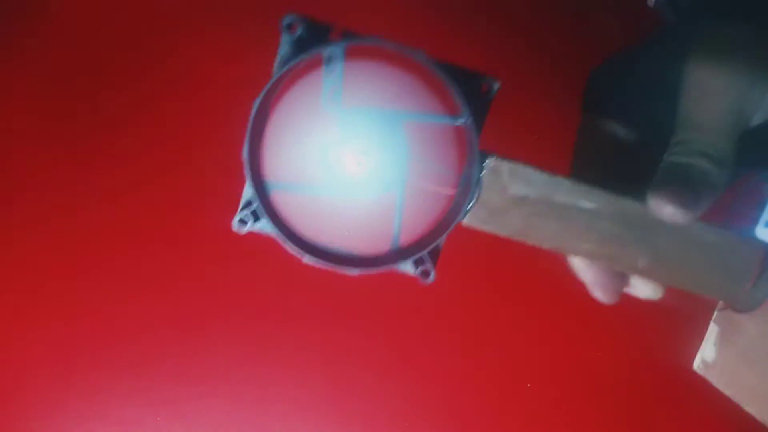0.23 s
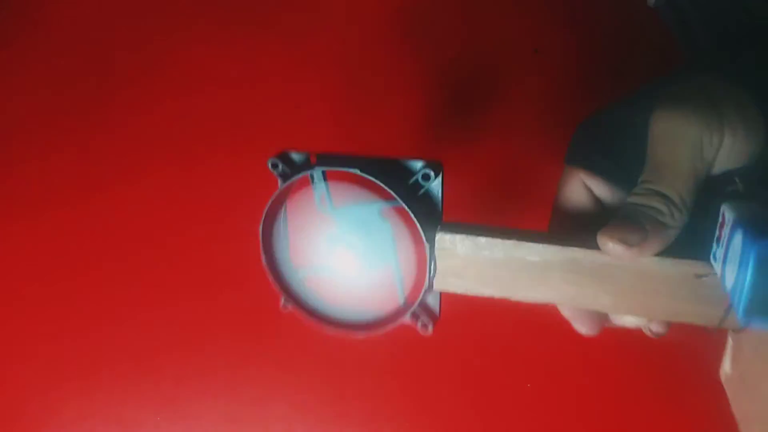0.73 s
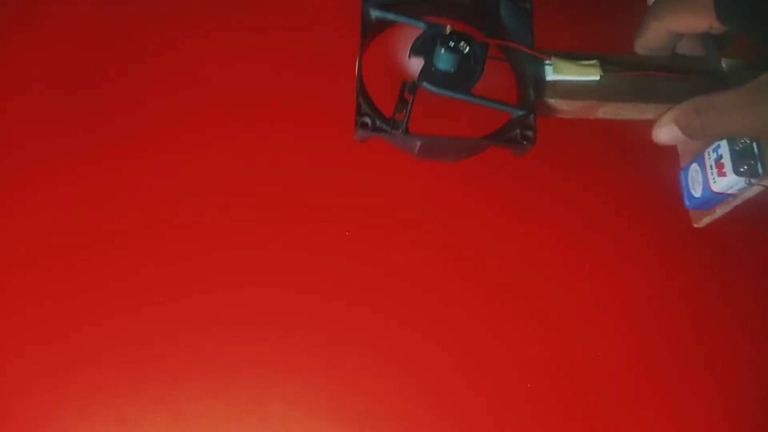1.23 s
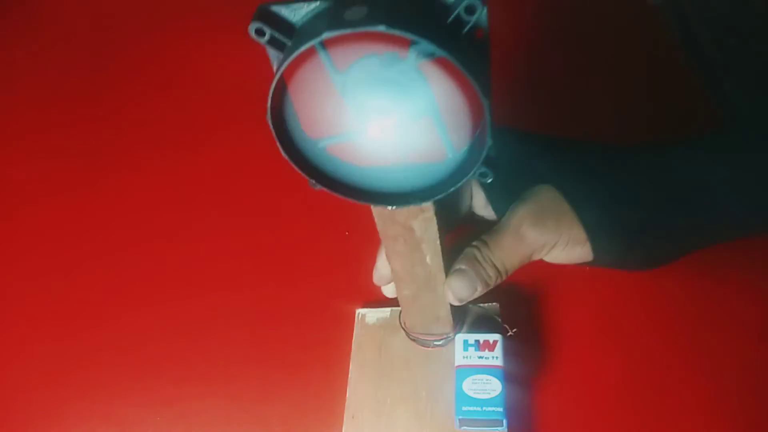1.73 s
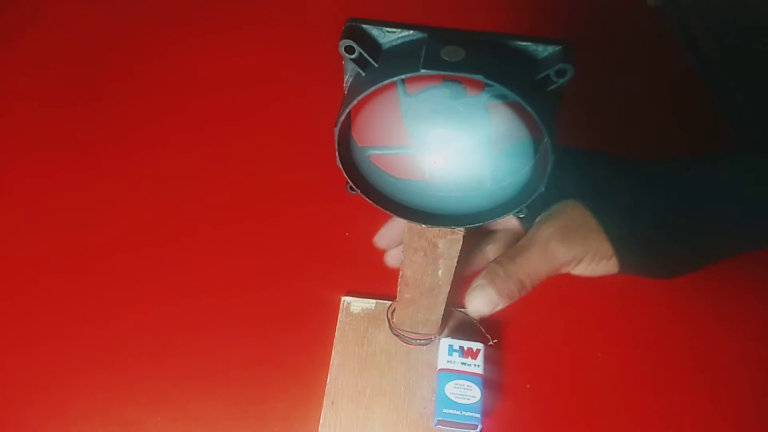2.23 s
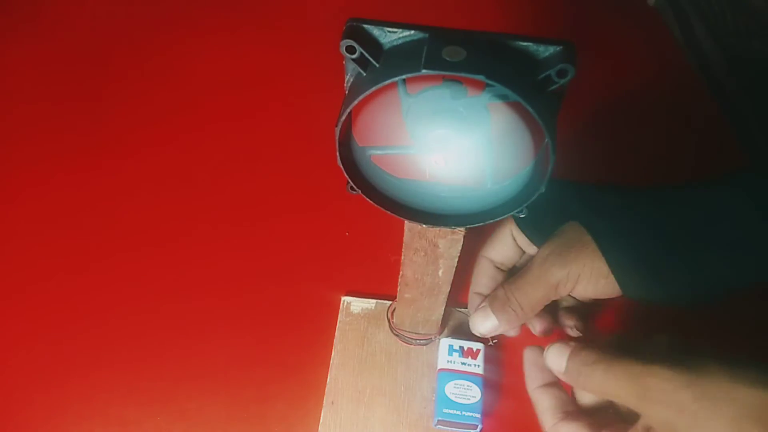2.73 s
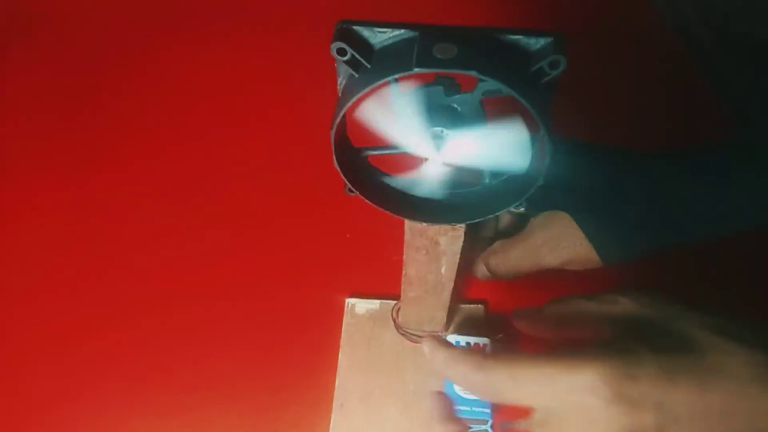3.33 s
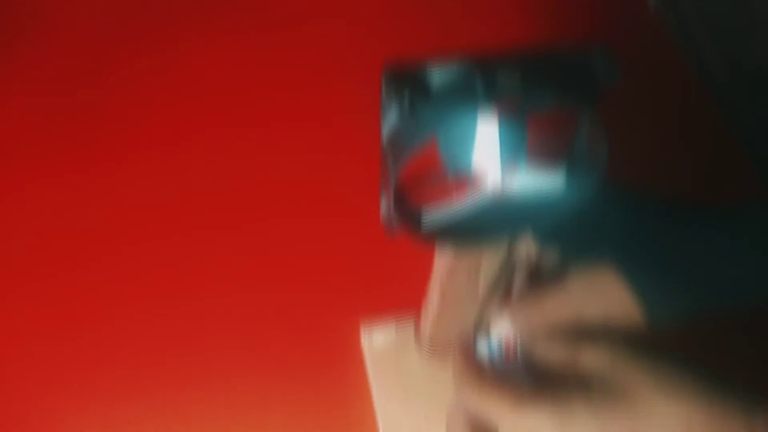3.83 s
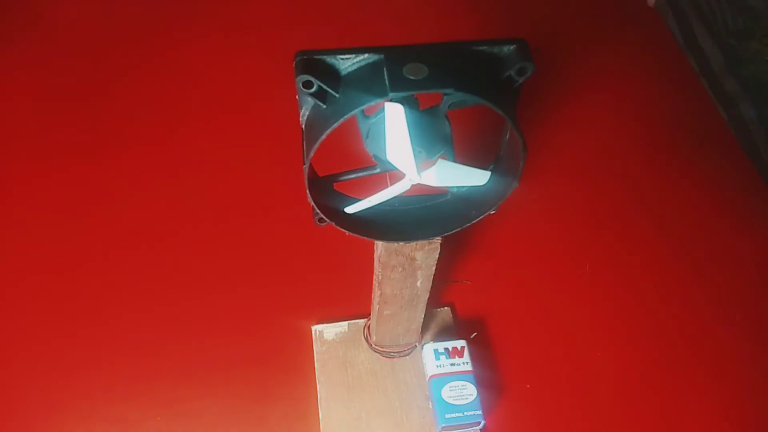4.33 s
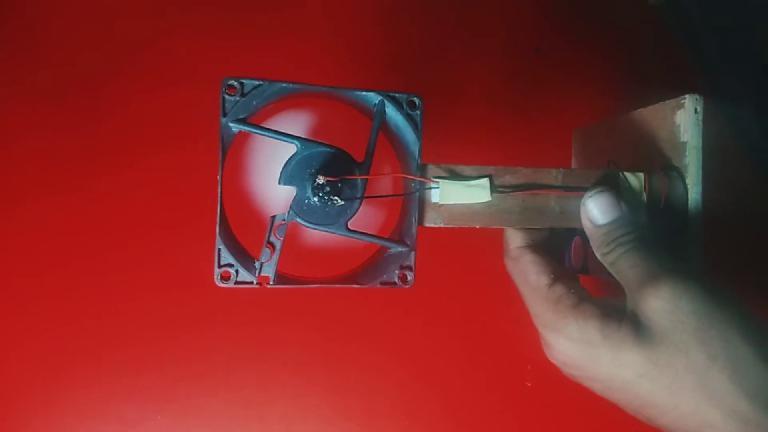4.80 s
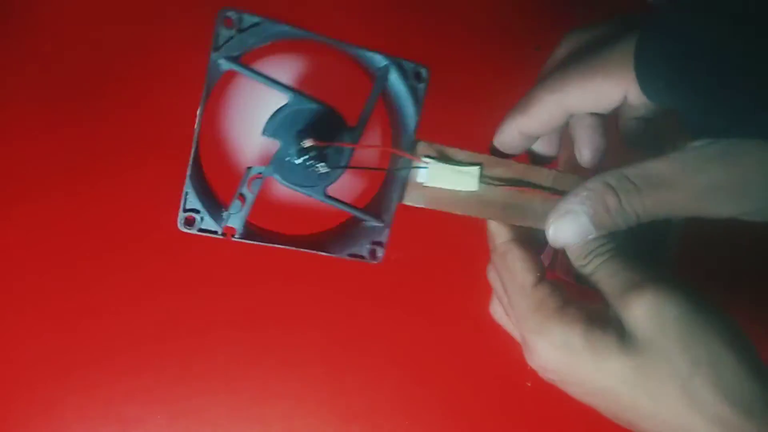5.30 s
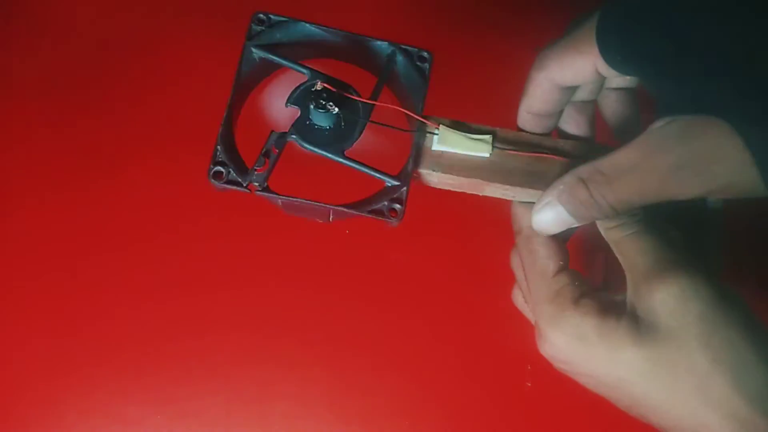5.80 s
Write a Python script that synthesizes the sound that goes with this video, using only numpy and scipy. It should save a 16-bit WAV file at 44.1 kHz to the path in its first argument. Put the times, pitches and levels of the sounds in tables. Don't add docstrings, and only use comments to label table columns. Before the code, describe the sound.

Close whirring of a little battery fan cuts out and coasts down, soft table knocks and ticks follow, then the hum rises again with windy buffeting.

```python
import sys
import numpy as np
from scipy import signal
from scipy.fft import rfft, irfft, next_fast_len
from scipy.io import wavfile
from scipy.ndimage import uniform_filter1d, map_coordinates

SR = 44100
rng = np.random.default_rng(int(sys.argv[2]) if len(sys.argv) > 2 else 0)


def boost(x):
    u = np.asarray(x, float) / 20
    return 10 ** u


def store_wav(level_fs):
    pcm = np.round(np.clip(np.atleast_2d(level_fs), -1, 1) * 32767)
    wavfile.write(sys.argv[1], SR, pcm.T.astype(np.int16))


N = 267025

OFF_S, ON_S = 0.585, 3.27


def unit(x):
    return x / np.sqrt(np.mean(np.abs(x) ** 2) + 1e-20)


def along(points, hz):
    f, v = np.transpose(points)
    return np.interp(np.log(hz + 1), np.log(f + 1), v)


def curves(rows):
    s, *columns = np.transpose(rows)
    return [np.interp(np.arange(N) / SR, s, column) for column in columns]


def wobble(rate):
    knots = rng.standard_normal(int(N * rate / SR) + 4)
    return map_coordinates(knots, [np.arange(N) * rate / SR])


def held(rows, rest, ease_s):
    t = np.arange(N) / SR
    steps = rest + sum((value - rest) * ((t >= start) & (t < end)) for start, end, value in rows)
    return uniform_filter1d(steps, size=max(round(ease_s * SR), 1))


def filtered(x, response):
    m = next_fast_len(N + 8192)
    return irfft(rfft(x, m) * response(np.fft.rfftfreq(m, 1 / SR)), m)[..., :N]


def panned(db):
    return boost(np.array([db / 2, -db / 2]))


def noise(spectrum, alike):
    def mid_side(hz):
        turn = np.arccos(np.clip(along(alike, hz), -1, 1)) / 2
        return boost(along(spectrum, hz)) * np.array([np.cos(turn), np.sin(turn)])

    mid, side = filtered(rng.standard_normal((2, N)), mid_side)
    return unit(np.array([mid + side, mid - side]))


def patchy(x, depth_db):
    z = signal.stft(x, nperseg=512)[2]
    field = uniform_filter1d(rng.standard_normal(z.shape[1:]), size=7, axis=0)
    field = uniform_filter1d(field, size=8, axis=1)
    return unit(signal.istft(z * boost(depth_db * unit(field)), nperseg=512)[1][:, :N])


def add(out, s, burst):
    at = round(s * SR) - burst.shape[-1] // 2
    place = out[..., at:at + burst.shape[-1]]
    place += burst[..., :place.shape[-1]]


def boom(db, hz, length, ragged_db, reach_hz, skew=0):
    t = np.arange(-3000, 3000) / SR
    band = signal.butter(2, [hz, hz + reach_hz], "band", fs=SR, output="sos")
    rag = signal.sosfilt(band, rng.standard_normal(len(t)))
    swell = boost(db - 6.0 * (2 * t / (length * (1 + skew * np.sign(t)))) ** 2)
    return swell * (np.cos(2 * np.pi * hz * t + rng.uniform(0, 7.5)) + boost(ragged_db) * unit(rag))


# (f/Hz, level/dB per Hz)
ROOM = [(18, -39), (30, -27), (81, -8), (225, -10), (293, -18.5), (482, -17), (928, -25), (1270, -29.5),
        (6610, -41.5), (14100, -36), (15700, -25.5)]
# (f/Hz, likeness 0-1)
ROOM_ALIKE = [(60, 0.79), (180, 0.9), (550, 0.35), (1650, 0.057), (4970, 0.12), (15000, 1)]


def room():
    return boost(-64 + 0.14 * wobble(6.1)) * noise(ROOM, ROOM_ALIKE)


def bump(s, db, hz, length, pan_db, out):
    wood = boom(db + 3.5, hz, length * 0.93, ragged_db=-15.5, reach_hz=91)
    add(out, s, panned(pan_db)[:, None] * wood)


# (t/s, level/dB, length/s)
THUMPS = [(1.122, -61, .022), (1.293, -56.5, 0.043), (1.552, -56, .024), (1.612, -54, 0.017),
          (1.829, -53.5, .026), (1.87, -53.5, 0.028), (2.107, -50, .036), (2.182, -53, 0.053),
          (2.313, -58.5, 0.029), (2.368, -60, 0.026), (2.463, -56.5, .038), (2.623, -49, 0.022),
          (2.652, -51, .04), (2.698, -50, 0.029), (3.042, -56, 0.02), (3.194, -61, .029),
          (3.238, -51, .018), (3.277, -56, 0.022), (3.31, -52, 0.031), (3.353, -47.5, 0.029),
          (3.385, -43, 0.022)]


def thumps():
    out = np.zeros((2, N))
    for s, db, length in THUMPS:
        hz = 79 * (1 + 0.12 * rng.standard_normal())
        bump(s, db, hz, length, -2, out)
    return out


# (t/s, level/dB, f/Hz, length/s)
JUDDERS = [(1.212, -58, 231, 0.035), (1.229, -57.5, 359, .04), (1.274, -56, 340, 0.02),
           (1.31, -58, 217, .069), (1.34, -62, 328, .022), (1.449, -52, 273, 0.026),
           (1.537, -56.5, 254, 0.035), (1.668, -48, 219, .063), (1.74, -49.5, 215, 0.025),
           (2.895, -56, 209.3, 0.017), (3.227, -57.5, 210, 0.039), (3.266, -56.5, 206, 0.022)]


def judders():
    out = np.zeros((2, N))
    for s, db, hz, length in JUDDERS:
        bump(s, db, hz, length, 3.5, out)
    return out


# (t/s, level/dB, treble level/dB, snap at the front level/dB)
TICKS = [(1.2994, -60, -9, -20), (1.4352, -55, -20, -8), (1.462, -58, -10, -20), (1.5294, -58, -13, -20),
         (1.8123, -61, -12, 8), (1.828, -62, 9, -4), (1.9585, -54, -16, -0.5), (1.974, -54, -20, -20),
         (2.755, -58, -14, -14), (3.0394, -64, -9, -10), (3.2482, -56, -4, -10), (3.2999, -52, -16, -14),
         (3.34, -46, -18, -20)]
TICK_T60_S, TICK_RISE_S, SNAP_T60_S = 0.065, 0.007, 0.005
# (from t/s, to t/s, level/dB)
RUBS = [
    (.8, 1.15, -69.5),
    (1.15, 1.95, -67),
    (1.95, 2.6, -75.5),
    (2.6, 2.85, -72),
    (2.85, 3.2, -80),
    (3.2, 3.38, -64.5),
]


def ticks_and_scuffs():
    t = np.maximum(np.arange(-3000, 3000), 0) / SR
    mid_colour = [(500, -20.0), (1000, 3.5), (2200, -1), (2800, 0.5), (3500, -3), (4700, -4), (5500, -17.5)]
    mid = noise(mid_colour, [(1000, 0.18)])
    top = noise(HISS, [(1000, 0.98)])
    strikes = np.zeros((2, N))
    for s, db, top_db, snap_db in TICKS:
        fade = boost(db - 2.0 - 60 * t / TICK_T60_S) * (1 - np.exp(-t / TICK_RISE_S))
        snap = boost(db + snap_db - 60 * t / SNAP_T60_S) * (t > 0)
        add(strikes, s, (fade + snap) * np.array([[1], [boost(top_db)]]))
    scuff = boost(held(RUBS, -100, 0.15) - 2.5 + 2 * wobble(22))
    return (strikes[0] + scuff) * mid + strikes[1] * top


# (t/s, level/dB, f/Hz)
PUFFS_LEFT = [(.67, -56, 114), (5.304, -37, 91), (5.363, -33.5, 97), (5.457, -36, 117), (5.487, -29.5, 124),
              (5.596, -29, 156), (5.609, -27.5, 94), (5.653, -38, 75), (5.693, -29.5, 133),
              (5.733, -33, 117), (5.854, -38.5, 86)]
# (t/s, level/dB, f/Hz)
PUFFS_RIGHT = [(0.148, -33, 155), (.67, -50, 113), (.723, -49, 103), (.752, -46, 91), (.797, -48.5, 103),
               (0.828, -54.5, 91), (0.885, -52.5, 96), (0.919, -47, 123), (.985, -47.5, 95),
               (3.736, -43, 102), (4.06, -40.5, 85), (4.368, -38.5, 86), (4.418, -29, 136.2),
               (4.796, -38, 97), (4.823, -28.5, 153), (5.137, -33, 144), (5.393, -30, 119),
               (5.427, -34, 113), (5.515, -33, 107), (5.58, -20, 172), (5.611, -29, 106), (5.658, -28, 150),
               (5.685, -28.5, 159), (5.72, -26, 90), (5.764, -24.5, 125), (5.785, -23, 121),
               (5.901, -31.5, 123.2), (5.925, -31, 106)]
EDDY_CYCLES = 2.2


def puffs():
    out = np.zeros((2, N))
    for port, rows in zip(out, (PUFFS_LEFT, PUFFS_RIGHT)):
        for s, db, hz in rows:
            length = EDDY_CYCLES / hz
            blow = boom(db + 6, hz, length * 0.83, ragged_db=-14.5, reach_hz=151, skew=0.63)
            heave = boom(db - 9.0, hz * 0.65, length * 2.2, ragged_db=-5, reach_hz=40)
            add(port, s - 0.004, blow)
            add(port, s, heave)
    return out


def driven(on, off):
    return held([(OFF_S, ON_S, off)], on, 0.035)


FRESH_HZ, TIRED_HZ, SAG_HZ_PER_S = 175.26, 175.3, 1.7
COAST_S, SPIN_UP_S, CREEP_HZ = 0.2, 0.2, 25.02
STARTED_S = 0.4


def speed():
    t = np.arange(N) / SR
    first = FRESH_HZ * np.tanh((t + STARTED_S) / SPIN_UP_S) / (1 + np.maximum(t - OFF_S, 0) / COAST_S)
    since = np.maximum(t - ON_S, 0)
    second = (TIRED_HZ - SAG_HZ_PER_S * since) * np.tanh(since / SPIN_UP_S)
    return np.maximum(np.maximum(first, second), CREEP_HZ)


def slowing():
    return np.log2(TIRED_HZ / uniform_filter1d(speed(), size=900))


PIECE_S, FIRST_CUT_S = 0.065, 0.035


def spliced(curve):
    t = (np.arange(N) / SR - FIRST_CUT_S) / PIECE_S
    stepped = np.floor(t) + 0.5 + (t % 1 - 0.5) * 0.3
    at = (uniform_filter1d(stepped, size=400) * PIECE_S + FIRST_CUT_S) * SR
    return np.interp(at, np.arange(N), curve)


# (t/s, left later by/ms, left-right level/dB, tone level/dB, whistle level/dB)
AIM = [
    (0, -0.1, -7.5, -3, -10),
    (.15, -0.027, -12, 3, -8.5),
    (.6, 0.07, -9, 1.5, -8.5),
    (3.3, -0.027, -6.5, 1, -6.5),
    (3.8, 0.0044, -10.5, 1.5, -6),
    (4.3, -0.038, -8.5, -2, -4.5),
    (4.75, 0.035, -10.5, 0.5, -4.5),
    (5.2, 0.051, -9.5, -0.5, -3.5),
    (5.75, 0.093, -9.5, 2.5, -2.5),
    (6.05, 0.077, -11, 1, -6),
]
TONE_DB, TONE_DRIVEN_DB, TONE_COASTING_DB = -44, 14, 8
KNEE_HZ, KNEE_WIDTH_HZ = 128, 2.4
KNEE_DRIVEN_DB, KNEE_COASTING_DB = 9, 11
STILL_HZ = 70


def shaft():
    hz = spliced(speed())
    under_knee = 1 / (1 + np.exp((hz - KNEE_HZ) / KNEE_WIDTH_HZ))
    lost_db = driven(TONE_DRIVEN_DB, TONE_COASTING_DB) * slowing()
    lost_db = lost_db + driven(KNEE_DRIVEN_DB, KNEE_COASTING_DB) * under_knee
    near_db = curves(AIM)[2]
    return hz, TONE_DB + near_db - lost_db - np.maximum(STILL_HZ - hz, 0)


# (multiple of shaft speed, width f/Hz, level/dB, left-right likeness 0-1, loss/dB per octave of slowing)
WAKES = [(2.86, 26.4, -9, 0.62, -21), (5.6, 17.7, 2.5, 0.29, 9), (8.39, 42.4, 1.5, 0.75, 26),
         (10.85, 62, -5.5, 0.78, -1), (13.95, 29, -8.5, 0.84, -3)]
FREE_AIR = 1.016
WAKE_FLOOR_OCT = 0.75


def wakes():
    hz = shaft()[0]
    turns = 2 * np.pi * np.cumsum(hz * (1 + 0.003 * wobble(7))) / SR
    freed = 2 * np.pi * np.cumsum(hz * held([(0, OFF_S, FREE_AIR - 1)], 0, 0.03)) / SR
    under = np.log2(hz / 174)
    spent = np.maximum(under, -2 * WAKE_FLOOR_OCT - under)
    out = 0
    for k, width_hz, db, alike, loss_db in WAKES:
        re, im = filtered(rng.standard_normal((2, 2, N)), lambda f: 1 / (1 + (f / width_hz) ** 2))
        a, b = re + 1j * im
        pair = np.array([a, alike * a + np.sqrt(1 - alike ** 2) * b])
        carrier = np.exp(1j * k * (turns + freed * (k < 7)))
        size = boost(db + np.minimum(loss_db * under, loss_db * spent))
        out = out + size * np.real(unit(pair) * carrier)
    return out


RUSH_DB, RUSH_DRIVEN_DB, RUSH_COASTING_DB = -34.5, 18.5, 25.5
# (f/Hz, level/dB per Hz)
BUFFET = [(25, -57), (50, -9), (80, 1.5), (130, -2), (200, -0.5), (300, -18), (500, -27)]
# (from t/s, to t/s, extra wash level/dB)
BLOWN = [
    (5.35, 5.5, 3.5),
    (5.58, 5.83, 5.5),
    (5.83, 6, 3),
]


def wash(rush_db):
    lumps = boost(2.33 * np.array([wobble(22), wobble(22.16)]))
    rumble = boost([[-17], [-11]]) * unit(lumps * noise(BUFFET, [(80, 0.89)]))
    return boost(0.88 * rush_db - 4 + held(BLOWN, 0.34, 0.087)) * rumble


# (f/Hz, level/dB per Hz)
RUSH = [(150, -20), (260, -26.5), (450, -17.5), (620, -30.5), (900, -9.5), (1200, -14), (1900, -14),
        (3800, -11.5), (4700, -18.5), (6000, -24), (7500, -40.5), (9000, -56)]
# (f/Hz, likeness 0-1)
RUSH_ALIKE = [(200, 0.83), (600, 0.16), (1200, 0.23), (3000, 0.45), (6000, 0.067), (12000, 0.53)]
# (f/Hz, level/dB per Hz)
HISS = [(5000, -33), (6500, -8), (8000, -16), (10300, -6.5), (13000, 1), (15000, 2), (16000, -8.5)]
# (f/Hz, width f/Hz, lift level/dB)
FRAME = [(1120, 33, 6), (1300, 60, 5), (2120, 520, 5.5), (2754, 25, 6.5), (3330, 124, 7), (3740, 250, 3),
         (4280, 370, 3.5)]
# (f/Hz, left-right level/dB)
TILT = [(60, 1), (150, 19.5), (380, -3.5), (950, 0), (2380, -1), (5980, -2.5), (15000, 5.5)]
HISS_DB, HISS_DRIVEN_DB, HISS_COASTING_DB = -11, 22, 16


def airflow():
    lag_ms, pan_db, _, wake_db = curves(AIM)
    rush_db = RUSH_DB - driven(RUSH_DRIVEN_DB, RUSH_COASTING_DB) * slowing()
    hiss_db = HISS_DB - driven(HISS_DRIVEN_DB, HISS_COASTING_DB) * slowing()
    gust_db = 0.9 * wobble(9)

    def frame(hz):
        return boost(sum(db / (1 + (2 * (hz - centre) / width) ** 2) for centre, width, db in FRAME))

    rush = filtered(patchy(noise(RUSH, RUSH_ALIKE), depth_db=1.0), frame)
    body = boost(-3.0 + 0.23 * wobble(30)) * rush + boost(wake_db + 1.0) * wakes()

    bright = np.clip((shaft()[0] - 95) / 55, 0.15, 1)
    dull = filtered(body, lambda hz: 1 / (1 + (hz / 3900) ** 8))
    body = dull + bright * (body - dull)

    shift = lag_ms * SR / 2000
    left = map_coordinates(body[0], [np.arange(N) - shift])
    right = map_coordinates(body[1], [np.arange(N) + shift])
    body = np.array([left, right])

    hiss = boost(hiss_db) * patchy(noise(HISS, RUSH_ALIKE), depth_db=2.5)
    air = filtered(panned(pan_db + 6.0) * body + hiss, lambda hz: panned(along(TILT, hz)))
    return boost(rush_db + gust_db) * air + wash(rush_db)


# (multiple of shaft speed, level/dB)
ORDERS_DB = [(1, 0), (2, -13), (3, -12), (4, -25), (5, -14), (6, -7), (7, -18), (10, -8), (11, -16),
             (14, -16)]


def motor():
    hz, tone_db = shaft()
    turns = 2 * np.pi * np.cumsum(hz * (1 + 0.0008 * wobble(14))) / SR
    slack_db = 7 * np.minimum(np.log2(hz / 168), 0)
    lead = np.array([[0.15], [-0.15]])
    out = 0
    for k, db in ORDERS_DB:
        size = boost(db + (k - 1) * slack_db + 2.0 * wobble(18))
        tone = np.sin(k * turns + lead + rng.uniform(0, 5.82))
        out = out + size * panned(4.1 + 3.1 * wobble(2.15)) * tone
    return np.sqrt(2) * boost(tone_db) * out


def scene():
    hands = thumps() + judders() + ticks_and_scuffs()
    return room() + hands + puffs() + airflow() + motor()


# (f/Hz, share of cells dropped 0-1)
STARVED = [(5200, 0.0014), (6300, 0.17), (7500, 0.46), (9500, 0.25), (11000, 0.014), (14000, .02)]


def starved(x):
    hz, _, z = signal.stft(x, SR, nperseg=1024)
    cells = rng.random((len(hz) // 7 + 1, z.shape[2] // 3 + 1))
    cells = cells.repeat(7, axis=0).repeat(3, axis=1)[:len(hz), :z.shape[2]]
    loud = np.sqrt((np.abs(z) ** 2).sum(axis=(0, 1))) > boost(-46)
    share = along(STARVED, hz)[:, None] * np.where(loud, 1, 0.06)
    return signal.istft(z * (cells >= share), SR, nperseg=1024)[1][:, :N]


def band_limit(x):
    return signal.sosfilt(signal.butter(12, 16800, fs=SR, output="sos"), x)


def record(dry):
    fade = np.clip(np.arange(N) / SR / 0.011, 0, 1)
    kept = filtered(dry * fade, lambda hz: (hz < 15530) / np.sqrt(1 + (44 / (hz + 1)) ** 6))
    return band_limit(starved(kept))


dry = scene()
out = record(dry)
store_wav(out)
```